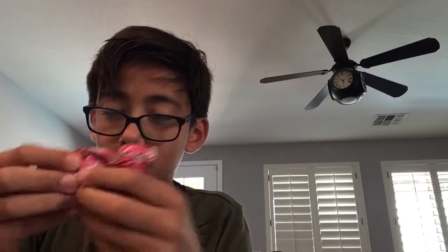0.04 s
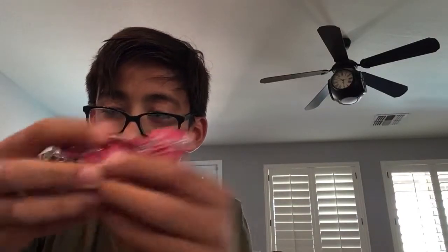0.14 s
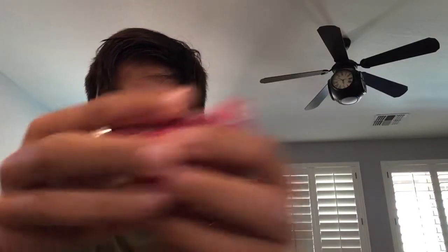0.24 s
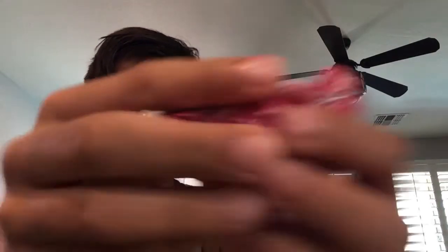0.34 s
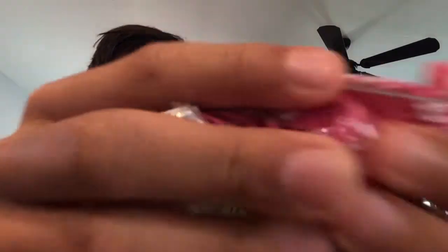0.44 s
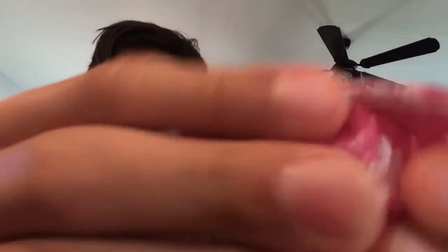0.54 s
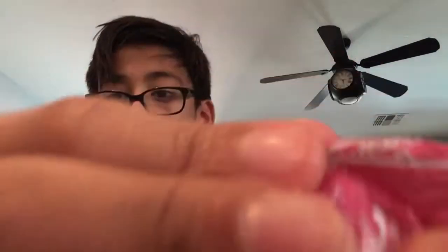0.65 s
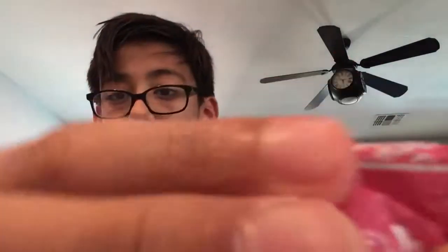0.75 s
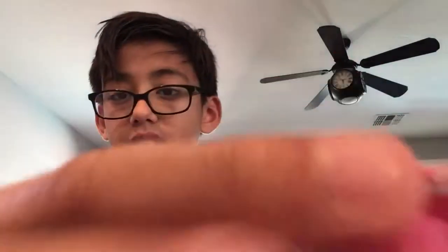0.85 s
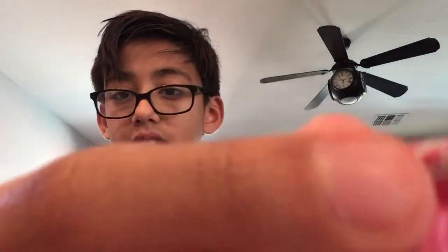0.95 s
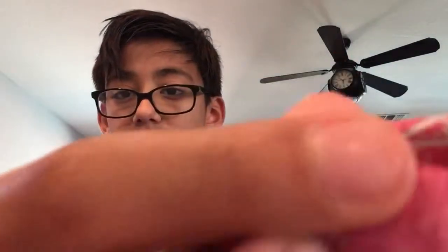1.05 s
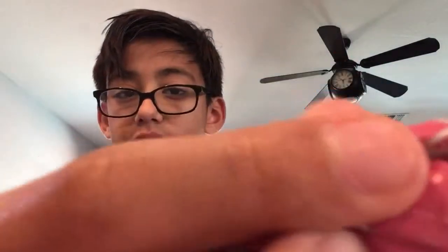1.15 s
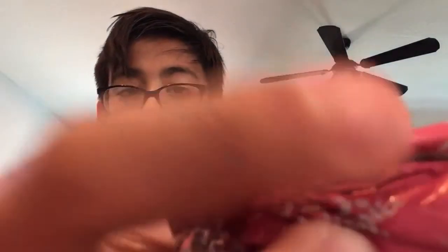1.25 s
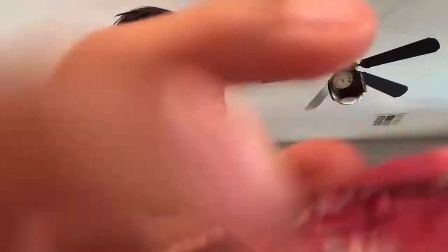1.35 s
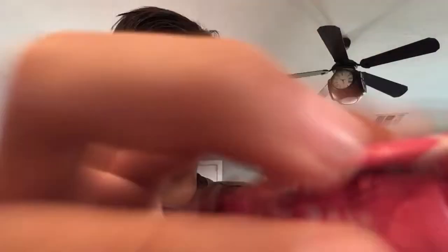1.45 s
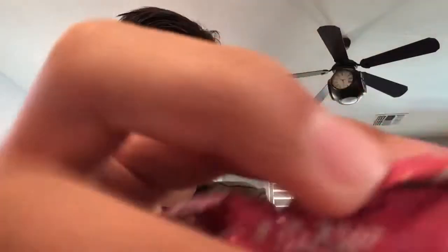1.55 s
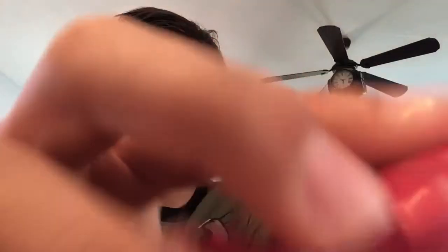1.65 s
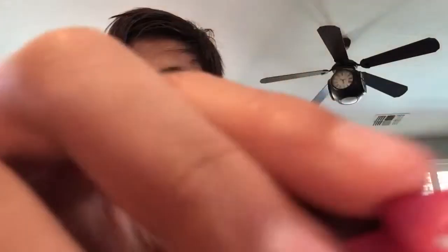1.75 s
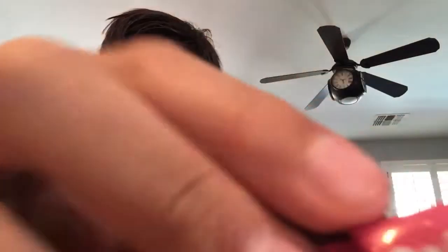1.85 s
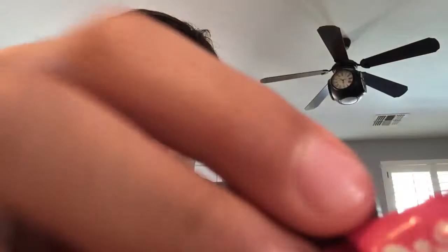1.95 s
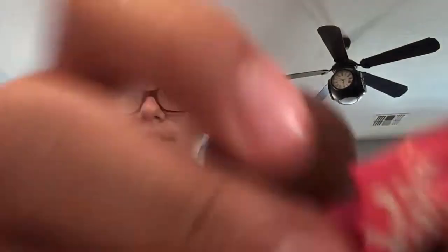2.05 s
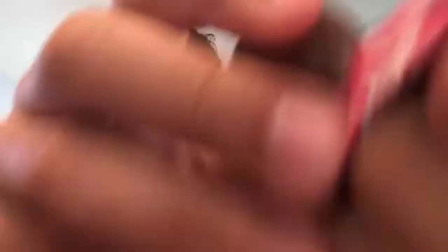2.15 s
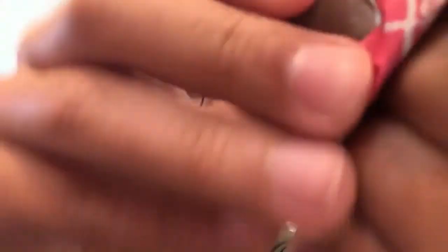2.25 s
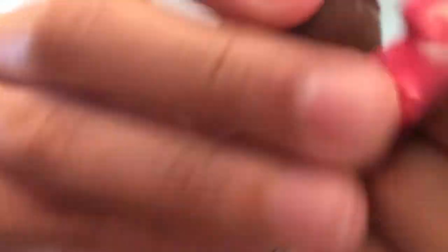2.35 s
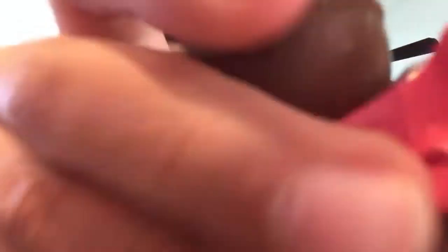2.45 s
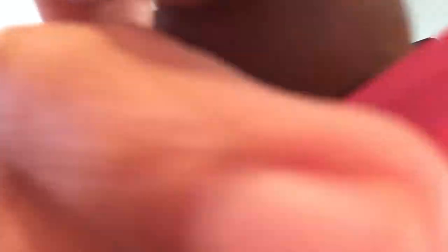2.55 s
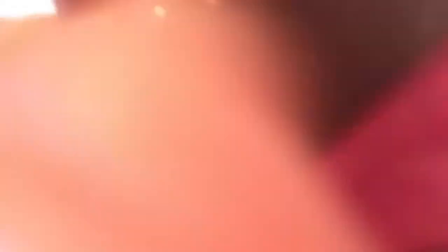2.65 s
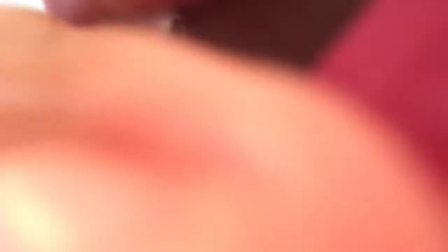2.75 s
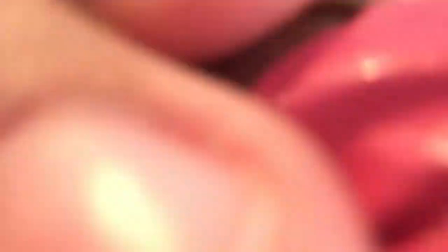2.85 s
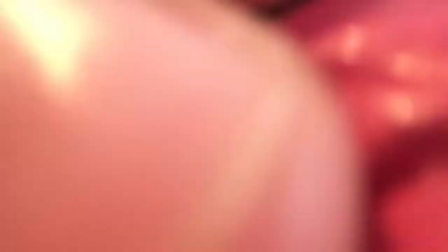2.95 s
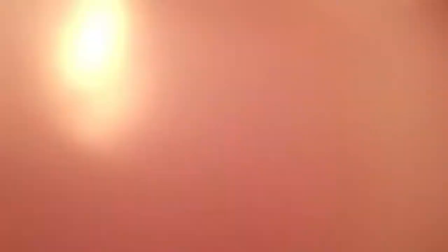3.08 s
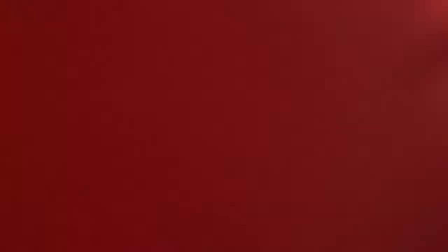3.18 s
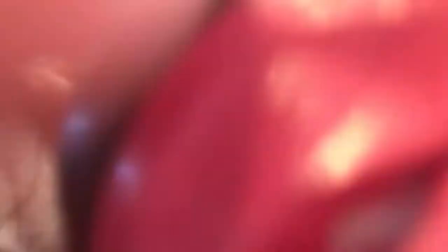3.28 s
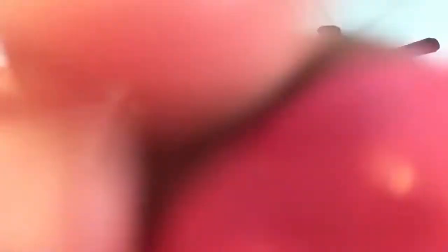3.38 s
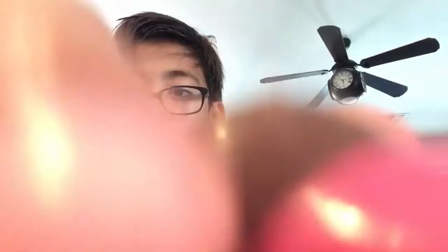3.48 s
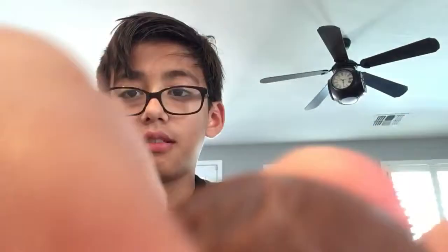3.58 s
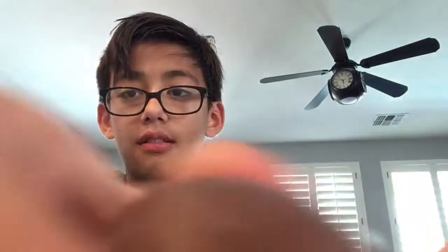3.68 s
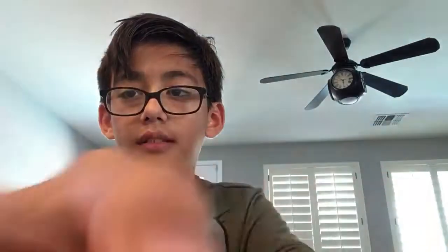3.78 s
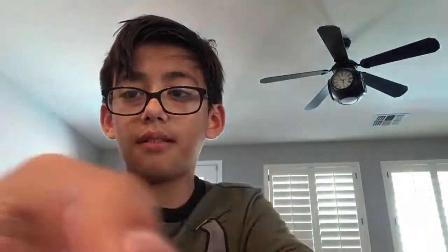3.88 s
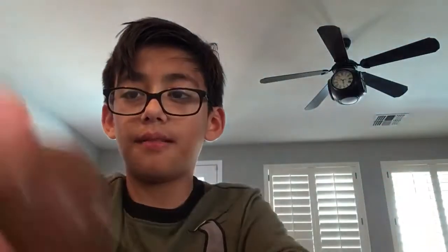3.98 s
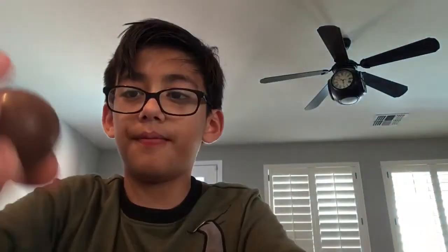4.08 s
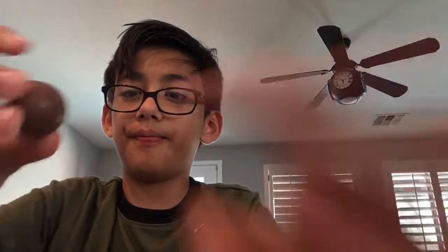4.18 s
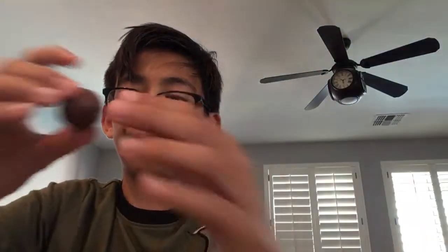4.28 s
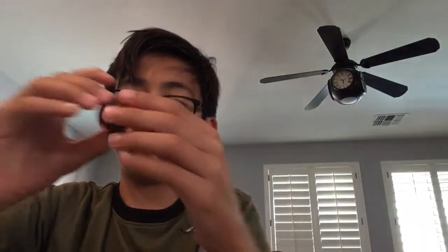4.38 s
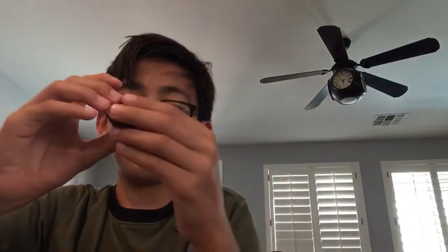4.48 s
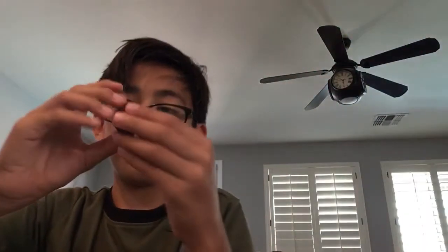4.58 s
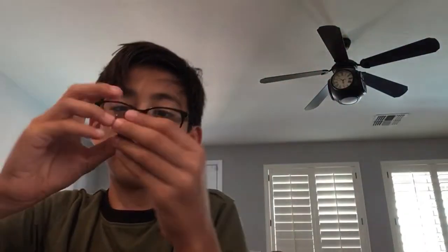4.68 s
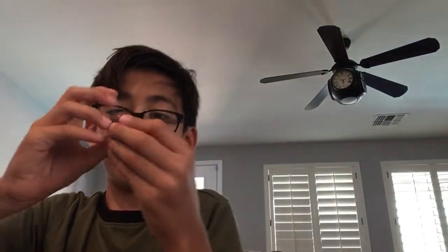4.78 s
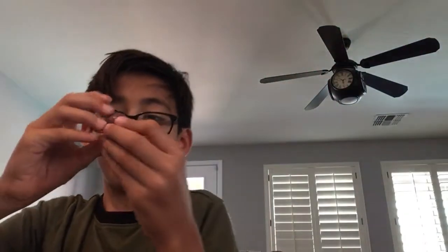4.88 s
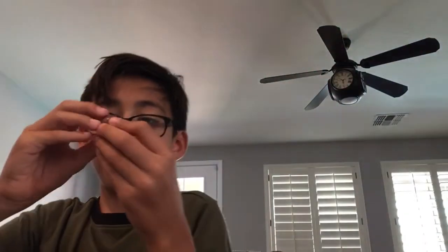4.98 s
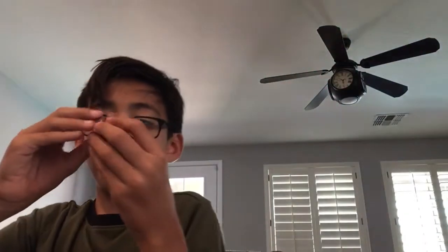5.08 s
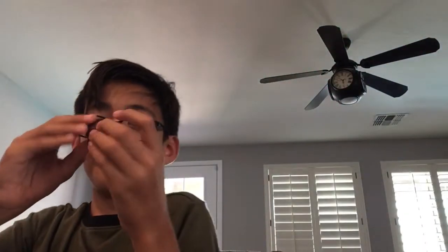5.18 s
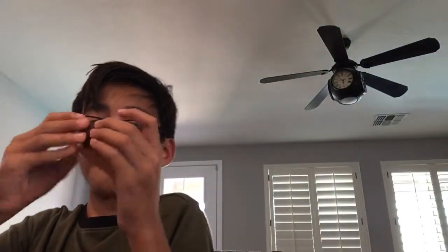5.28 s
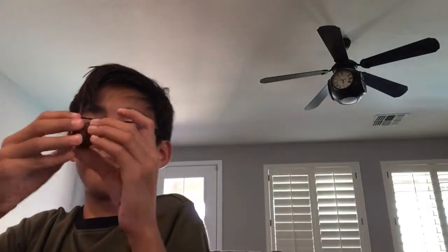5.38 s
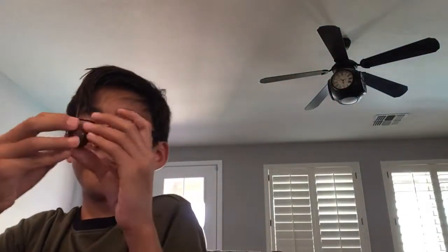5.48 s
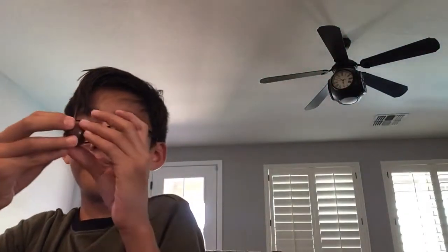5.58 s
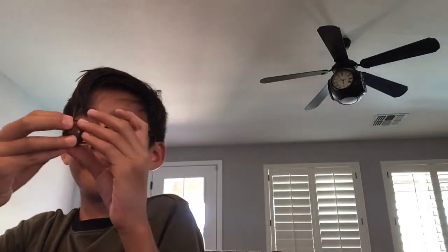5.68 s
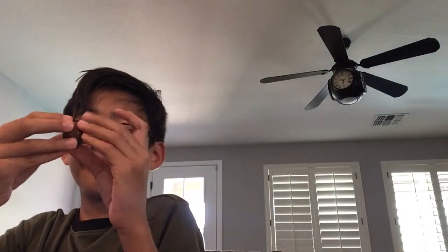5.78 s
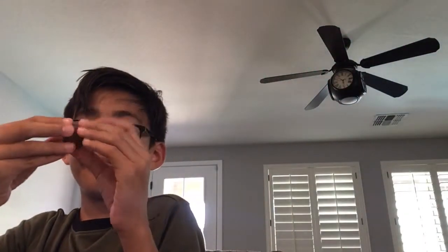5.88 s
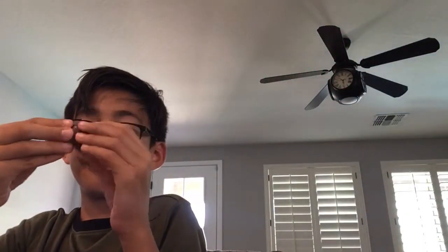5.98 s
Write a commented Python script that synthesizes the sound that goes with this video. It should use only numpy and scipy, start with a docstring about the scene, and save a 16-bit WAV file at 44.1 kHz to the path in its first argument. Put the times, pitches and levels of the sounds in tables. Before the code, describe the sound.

Close, dense crinkling of a sweet wrapper being undone by hand swells with a few soft air thumps, then stops, leaving faint ventilation hum.

```python
"""Fingers unwrap a sweet right in front of a small microphone in a quiet room.
An air handler hums low throughout. From the start the plastic film hisses and ticks against the skin;
then its creases buckle, each snap ringing a film panel and the hollow of the cupped hands and wrapper.
Between 2.7 and 3.7 s, as the hollow rings loudest, the film pushes puffs of air at the microphone.
The snaps die out by 4.3 s and the sliding by 5 s, leaving the air handler alone."""
import sys
import numpy as np
from scipy import signal
from scipy.fft import rfft, irfft
from scipy.io import wavfile
from scipy.ndimage import uniform_filter1d

SR = 44100
rng = np.random.default_rng(int(sys.argv[2]) if len(sys.argv) > 2 else 0)


def persist_wave(psi):
    """Save psi, clipped to +-1, as 16-bit WAV."""
    counts = np.round(np.clip(psi, -1, 1) * 32767).astype(np.int16)
    wavfile.write(sys.argv[1], SR, np.atleast_2d(counts).T)


N = 265816

# Strong creases that buckle: start_s, crack_db, panel_hz, panel_db, hollow_db (levels are energies)
STRONG_CREASES = [(0.1626, -30, 6420, -28.5, -55), (0.2057, -14.5, 4100, -26, -41),
                  (0.2663, -23, 4370, -23, -35), (0.2872, -19, 3900, -22, -31),
                  (0.3036, -14.5, 6240, -27, -29), (0.322, -26, 5800, -27, -52),
                  (0.3437, -14, 6660, -36, -52), (0.3705, -13.5, 6330, -24.5, -47),
                  (0.3867, -22, 3370, -14.5, -37), (0.4368, -16.5, 5400, -24, -46),
                  (0.4554, -19, 3870, -22.5, -27), (0.5422, -6.5, 6050, -15, -27),
                  (0.5603, -7, 3330, -9, -33), (0.5753, -26, 4300, -16, -32),
                  (0.6032, -31, 3040, -14.5, -24.5), (0.6194, -12, 4690, -21, -19.5),
                  (0.6279, -21, 5570, -21, -38), (0.649, -9, 4260, -14.5, -23),
                  (0.6745, -14, 3330, -19, -31), (0.6906, -4, 2750, -5.5, -19),
                  (0.6996, -26, 1820, -12, -25), (0.7215, -17.5, 4950, -30.5, -55),
                  (0.7693, -5, 4100, -8, -21), (0.7939, -34, 2790, -33, -27), (0.801, -27, 5800, -35, -46),
                  (0.852, -18, 2820, -19, -32), (0.901, -23, 6790, -30, -40),
                  (0.9186, -26, 2060, -21.5, -24.5), (0.9645, -21, 1800, -19, -25.5),
                  (0.9944, -11.5, 4640, -31, -36), (1, -8, 1940, -13, -24), (1.0081, -20, 6730, -17, -15.5),
                  (1.016, -5, 2720, -26, -28), (1.0238, -7, 5600, -7, -27), (1.0275, -6, 5540, -17, -22),
                  (1.0355, -15, 5380, -18, -36), (1.0404, -7, 5040, -7, -24), (1.052, -23, 5910, -39, -35),
                  (1.0611, -3, 2990, -4.5, -35), (1.071, -6, 6260, -10, -14.5),
                  (1.1364, -7, 5760, -14, -31), (1.1411, -10, 2750, -10, -31), (1.1452, -9, 4470, -27, -29),
                  (1.155, -4.5, 6200, -13, -26), (1.2153, -21, 3900, -25, -43),
                  (1.2267, -5, 6530, -16, -20.5), (1.2671, -13, 6060, -9.5, -38),
                  (1.3584, -18, 6000, -23.5, -41), (1.3765, -2, 4390, -7, -31),
                  (1.394, -9, 6030, -12, -19.5), (1.4033, -14, 1940, -21, -12.5),
                  (1.4245, -18.5, 3960, -13, -22), (1.476, -14, 1810, -27, -16.5),
                  (1.4916, -2, 6640, -12.5, -13), (1.4982, -13, 5490, -38.5, -24.5),
                  (1.5062, 2.5, 6620, 1.5, -10), (1.5201, -8, 3970, -11, -33),
                  (1.5416, -21, 2690, -19.5, -17.5), (1.553, -7.5, 4000, -4, -31.5),
                  (1.5663, -2, 6790, -11, -30), (1.585, -8, 4060, -12, -42), (1.6254, -12, 4030, -19, -44),
                  (1.642, -4, 3380, -16, -35), (1.6962, -15, 4020, -17.5, -30.5),
                  (1.7028, -18.5, 6540, -15, -24.5), (1.712, -6, 6500, -14.5, -15.5),
                  (1.7246, 5.5, 7030, -3.5, -20), (1.741, 3.5, 6310, 4.5, -9.5),
                  (1.7458, -12, 6660, -11, -29), (1.7661, -1, 6100, -9.5, -13),
                  (1.776, -14, 5540, -11.5, -30), (1.8006, -4, 3570, -12.5, -33),
                  (1.8687, -9.5, 4630, -6.5, -28), (1.875, -4.5, 4500, -11, -37),
                  (1.894, -17, 3530, -6, -13), (1.927, -30, 4970, -23, -45), (1.9568, -6, 6900, -15, -38),
                  (1.96, -3.5, 3900, -7.5, -39), (1.9636, -13, 6640, -16, -38), (1.9854, -7, 4700, -6, -30),
                  (1.9879, -0.5, 2780, -3, -33), (2.0027, -1.5, 2900, -0.5, -34),
                  (2.006, -3, 4840, -18, -37), (2.0097, -12, 6370, -16.5, -39),
                  (2.0214, -2, 4390, -11, -34), (2.0327, -6, 4500, -14, -44), (2.0522, -5, 3920, -13, -38),
                  (2.0553, 4.5, 6900, 2, -39), (2.0685, -4, 3200, -8, -22), (2.079, -10, 6790, -18, -39),
                  (2.0845, -4, 5700, -15, -40), (2.087, -4, 6310, -18, -31),
                  (2.093, -2.5, 3450, -12.5, -26), (2.1011, -12, 6520, -15, -34),
                  (2.1325, -13, 3410, -9, -19), (2.1449, -6.5, 3430, -12.5, -42),
                  (2.1556, -22, 3520, -18, -43), (2.189, -4, 6500, -15, -36),
                  (2.2674, -17.5, 4480, -12, -19), (2.2921, -32, 4400, -22, -49),
                  (2.3188, -28, 6690, -20, -43), (2.3412, -16, 3200, -9, -37), (2.3524, -2, 3580, -1, -18),
                  (2.3713, -16, 2590, -17, -38.5), (2.383, -10.5, 6740, -16, -36.5),
                  (2.4004, -22, 2780, -13.5, -30), (2.4035, -13, 6100, -19, -34),
                  (2.4247, -4, 6050, -29, -41), (2.434, -15.5, 2910, -23.5, -38),
                  (2.4544, -4, 6870, -12, -47), (2.4657, -2, 4770, -11, -46),
                  (2.473, -18, 3120, -25.5, -39), (2.4918, -20.5, 2500, -18.5, -19.5),
                  (2.5254, -10, 5463, -13, -24.5), (2.603, -14.5, 1801, -7, -0.5),
                  (2.6059, 8, 5320, 2.5, -12.5), (2.6328, -15.5, 4370, -23, -33),
                  (2.643, -17, 6830, -28, -37), (2.6501, 1, 5600, -3, -32.5),
                  (2.6739, -0.5, 5440, -1.5, -24), (2.689, -1.5, 2534, -6, -29.5),
                  (2.691, -8, 3252, -6.5, -30), (2.6964, -14, 2840, -2, -28), (2.7101, 5, 5224, -2, -21),
                  (2.7237, -2, 4544, -6.5, -29), (2.7368, -7.5, 1810, -16, -3),
                  (2.7435, -14, 2952, -7.5, -12.5), (2.7473, -2, 2887, -1, 2),
                  (2.7518, -3, 3980, -2.5, -8.5), (2.7575, -1.5, 5350, 1, 0.5),
                  (2.7627, -13.5, 2870, -5, -7), (2.7679, 8, 6055, 4, 3), (2.782, -32, 1802, -20, -1.5),
                  (2.8067, 6, 2844, 0.5, -5.5), (2.8162, 3, 2140, 3, 2.5), (2.8363, -25, 5560, -27, -11.5),
                  (2.8586, -33.5, 2060, -28.5, 0), (2.8724, -23.5, 2170, -14.5, -11.5),
                  (2.883, 1.5, 6100, -2.5, -2.5), (2.8964, -26.5, 1820, -13, -6),
                  (2.931, -5.5, 6790, -11.5, -33), (2.9348, 5, 5320, 4.5, -1),
                  (2.9544, -12, 6730, -20.5, -29), (2.9903, -22, 4490, -12.5, -32),
                  (3.001, 4.5, 4680, 1.5, -7), (3.0487, 4.5, 4480, -2, -7.5), (3.0726, -20, 2260, -13, -4),
                  (3.1008, -2.5, 5940, -3.5, -23), (3.1112, -10.5, 1810, -19.5, -9),
                  (3.118, 0.5, 1807, -7.5, -11), (3.1327, 1, 3380, -7, -14), (3.1507, -6, 2360, -5, 0.5),
                  (3.1592, -12, 2395, -1.5, -1), (3.1774, -10.5, 2450, -31, -9.5),
                  (3.1859, -17, 2440, 0, 4.5), (3.1895, -11, 2435, -3.5, 3.5),
                  (3.1932, -17.5, 1980, -1.5, 4.5), (3.1974, -16, 1963, -8.5, -5.5),
                  (3.2031, -3, 3420, 3, -2.5), (3.2172, -18.5, 1810, -13, 2),
                  (3.2219, -14.5, 1903, -14.5, -7.5), (3.2257, -9.5, 1798, -9, -9.5),
                  (3.23, -12.5, 3510, -10, -16.5), (3.2334, -20, 1816, -13.5, -10),
                  (3.2372, -18.5, 2850, -11.5, -7), (3.2413, -16, 1810, -15, -11),
                  (3.2472, -16.5, 1864, -8, 7), (3.2542, -14, 1832, -3.5, -0.5),
                  (3.261, -17, 5880, -16, -11), (3.2658, -21, 2480, -9.5, -11.5),
                  (3.3217, -19, 2680, -10.5, -12), (3.3333, -31, 2720, -7.5, -10.5),
                  (3.3526, 8, 2620, -0.5, 1.5), (3.3594, -17.5, 2660, -5, 0), (3.3757, 3, 4070, -2.5, -0.5),
                  (3.4047, -14.5, 2070, -16, -5), (3.4301, 1.5, 5240, -2.5, -14),
                  (3.4512, -5.5, 4860, -4.5, -7.5), (3.4666, -6, 2870, -9.5, -20.5),
                  (3.4914, -13, 5955, -22.5, -26.5), (3.5142, -15.5, 2890, -9, -20.5),
                  (3.527, -6.5, 6800, -4.5, -19), (3.5567, -7, 3904, -5.5, -9),
                  (3.5641, -5.5, 3990, -7.5, -13), (3.5705, 3.5, 3966, -0.5, -2),
                  (3.5854, -13, 1810, -17, -10), (3.6231, -10.5, 2120, -6.5, -11),
                  (3.6373, -2, 2640, 2.5, 4.5), (3.6405, -4, 4310, -6.5, -17.5),
                  (3.6535, -9, 4080, -12, -19.5), (3.6643, 2.5, 4500, -1.5, -24.5),
                  (3.6754, -9, 4780, -14, -24), (3.695, 5.5, 3820, -3, -22.5), (3.7048, 4, 4000, -0.5, -15),
                  (3.7158, -15, 5840, -16.5, -32), (3.7365, 4, 5340, -5.5, -26),
                  (3.7515, 3, 5070, -1, -27.5), (3.7707, -4.5, 2920, -12.5, -44),
                  (3.844, -13, 5840, -29, -34), (3.8575, 0, 6560, -21, -27), (3.8655, -17, 2060, -14, -11),
                  (3.8701, -9, 5010, -14, -20), (3.8729, -3, 5440, -6.5, -24),
                  (3.9149, -3.5, 4770, -20, -27), (3.959, -6.5, 6400, -18.5, -28),
                  (4.0206, -26, 2300, -23, -21.5), (4.043, -25.5, 2930, -20, -44),
                  (4.071, -41, 5330, -37, -32), (4.089, -36, 3580, -34, -32.5),
                  (4.2086, -32, 1810, -37, -42), (4.2874, -46, 1840, -31, -23)]
# Cavity of the cupped hands: time_s, resonance_hz, octave_share (of creases that ring its octave, 0-1)
HOLLOW = [(0, 750, .6), (2.55, 663, .6), (2.75, 684, .25), (3.05, 745, .1), (3.15, 1240, 0),
          (3.34, 1380, 0), (3.37, 750, 0.05), (3.52, 787, 0.26), (3.63, 1100, 0), (3.75, 684, 0.2),
          (4.5, 620, 0.38)]


def gain_of(db):
    """Amplitude ratio of a level in decibels."""
    return 10 ** (np.asarray(db) / 20)


def unit_rms(x):
    """The signal scaled to a mean power of 1."""
    return x / np.sqrt(np.mean(x ** 2) + 1e-20)


def unit_energy(rows):
    """Each row scaled to an energy of 1."""
    return rows / np.linalg.norm(rows, axis=-1, keepdims=True)


def coloured(x, spectrum):
    """Zero-phase filtering of the last axis by points of frequency_hz, gain_db."""
    points_hz, db = np.transpose(spectrum)
    hz = np.fft.rfftfreq(x.shape[-1], 1 / SR)
    response = gain_of(np.interp(np.log(hz + 1), np.log(points_hz + 1), db))
    return irfft(rfft(x) * response, x.shape[-1])


def resonate(x, hz, width_hz):
    """Tunable resonance by heterodyning: shift hz down to zero, smooth, and shift back."""
    carrier = np.exp(2j * np.pi * np.cumsum(hz * np.ones(len(x))) / SR)
    pole = np.exp(-np.pi * width_hz / SR)
    return 2 * (carrier * signal.lfilter([1 - pole], [1, -pole], x / carrier)).real


def curve(rows, column):
    """One column of a table, interpolated linearly in time to every sample."""
    rows = np.asarray(rows)
    return np.interp(np.arange(N) / SR, rows[:, 0], rows[:, column])


def ring(t, hz, t60_s, rise_s):
    """Free vibration of damped modes: a soft-starting sine of energy 1 for each pitch."""
    modes = np.sin(2 * np.pi * hz[:, None] * t) * gain_of(-60 * t / t60_s)
    return unit_energy(modes * (1 - np.exp(-t / rise_s)))


def air_handler():
    """Ventilation noise: a steady continuous spectrum plus motor tones whose pitch wavers."""
    # Spectrum of the room air: frequency_hz, gain_db
    air_spectrum = [(18, -43), (30, -12.5), (43, 4.5), (91, -7.5), (125, -9.5), (217, -13.5), (291, -16.5),
                    (547, -31.5), (608, -23), (659, -29.5), (713, -34.5), (858, -38.5), (2160, -41),
                    (11400, -52.5), (16500, -69)]
    # Motor tones: pitch_hz, waver_hz, level_db
    motor_tones = [(120.5, 5, -55), (59, 4, -61), (700, 12, -76)]
    wash = gain_of(-49.5) * unit_rms(coloured(rng.standard_normal(N), air_spectrum))
    wavers = uniform_filter1d(rng.standard_normal((len(motor_tones), N)), 2000)
    hum = np.zeros(N)
    for (pitch_hz, waver_hz, level_db), waver in zip(motor_tones, wavers):
        phase = 2 * np.pi * np.cumsum(pitch_hz + waver_hz * unit_rms(waver)) / SR
        hum += np.sqrt(2) * gain_of(level_db) * np.sin(phase)
    return wash + hum


def hand_shadow(room_sound):
    """Acoustic shadowing: hand and wrapper vary how much of the room reaches the microphone."""
    # Transmission past the hand: time_s, gain_db
    transmission = [(2.72, 2), (2.8, -1), (3.47, -4), (3.52, 1.5)]
    return gain_of(curve(transmission, 1)) * room_sound


def small_creases(strong_onsets, rate_hz=550, kinds=24):
    """Shot noise: small creases give way at random, ticking louder around the strong ones."""
    sizes = gain_of(7 * np.minimum(rng.exponential(1, N), 3))
    impulses = sizes * (rng.random(N) < rate_hz / SR)
    kind = rng.integers(0, kinds, N)
    t = np.arange(256) / SR
    clicks = rng.standard_normal((kinds, len(t))) * gain_of(-60 * t / .0055)
    modes = ring(t, rng.uniform(2500, 13000, kinds), t60_s=.003, rise_s=.0002)
    grains = unit_energy(clicks + .7 * modes * np.linalg.norm(clicks[0]))
    ticks = sum(signal.oaconvolve(impulses * (kind == k), grain)[:N] for k, grain in enumerate(grains))
    return unit_rms(ticks * (.3 + signal.oaconvolve(strong_onsets, np.hanning(1500), "same")))


def rustle(crowd_s=.11, let_go_s=4.96, fade_s=.55):
    """Friction noise of film on skin and small ticks, heard directly and through cavity resonance."""
    # Film sliding under the fingers, relative levels: time_s, hiss_db, hollow_db, ticks_db
    slide_levels = [(0, -53, -69, -61), (0.3, -61, -71, -58), (0.6, -58.5, -69, -46), (0.85, -60, -69, -53),
                    (1.12, -59, -63.5, -48.5), (1.5, -61.5, -53.5, -41.5), (1.75, -53, -66.5, -50.5),
                    (2.1, -59, -84, -46.5), (2.45, -56, -63, -46.5), (2.6, -51.5, -51.5, -43),
                    (2.84, -81, -47, -43.5), (3.03, -69, -55.5, -40.5), (3.2, -51, -36, -46.5),
                    (3.3, -62, -47, -43), (3.42, -46, -42, -42.5), (3.58, -50, -48.5, -45),
                    (3.66, -49, -46.5, -33), (3.8, -37.5, -51.5, -49), (3.9, -50.5, -51, -44.5),
                    (4.1, -66.5, -79, -61.5), (4.5, -56, -66.5, -63)]
    # Spectrum of the sliding film: frequency_hz, gain_db
    film_spectrum = [(710, -37.5), (1200, -10.5), (2590, 2), (5160, -0.5), (6500, 0.5), (7410, -5),
                     (11200, -2.5), (15100, -2), (16500, -24)]
    hiss_gain, hollow_gain, tick_gain = (gain_of(curve(slide_levels, column)) for column in (1, 2, 3))
    onsets = np.bincount(np.round(np.transpose(STRONG_CREASES)[0] * SR).astype(int), minlength=N)
    ticks = small_creases(onsets)
    crowding = signal.oaconvolve(onsets, np.hanning(round(crowd_s * SR)), "same")
    sliding = .15 + unit_rms(crowding)  # the film slides hardest where creases crowd
    hiss = rng.standard_normal(N) * sliding
    film = coloured(hiss_gain * hiss + tick_gain * ticks, film_spectrum)
    film /= np.std(coloured(unit_rms(hiss), film_spectrum))
    skin = rng.standard_normal(N) * np.sqrt(sliding)
    hollow = unit_rms(resonate(skin + .5 * ticks, curve(HOLLOW, 1), width_hz=460))
    palm_rumble = gain_of(-7) * unit_rms(resonate(skin, hz=270, width_hz=200))
    let_go = np.clip((let_go_s - np.arange(N) / SR) / fade_s, 0, 1)
    return (film + hollow_gain * (hollow + palm_rumble)) * let_go


def reflections(x, t60_s=.15):
    """Reverberation: hands, table and walls return a short, exponentially decaying echo."""
    t = np.arange(SR // 4) / SR
    tail = rng.standard_normal(len(t)) * (t > .003) * gain_of(-60 * t / t60_s)
    return signal.oaconvolve(x, unit_energy(tail))[:N]


def coupled_creases(weaker_db=22.5, spread_db=8, low_hz=1800, high_hz=6600):
    """Elastic coupling: each strong crease is joined by a weaker one just before or after it."""
    strong = np.asarray(STRONG_CREASES)
    draws = rng.random((len(strong), 6))
    gap_s = .003 - .0055 * np.log(draws[:, 1])
    start_s = strong[:, 0] + np.sign(draws[:, 0] - .4) * gap_s
    scatter_db = spread_db * (2 * draws[:, 2:5] - 1)
    crack_db, panel_db, hollow_db = (strong[:, [1, 3, 4]] - weaker_db + scatter_db).T
    panel_hz = low_hz * (high_hz / low_hz) ** draws[:, 5]
    weak = np.column_stack([start_s, crack_db, panel_hz, panel_db, hollow_db])
    return np.concatenate([strong, weak])


def fracture_bursts(t, lead, strength_db, flip_s=.00025):
    """Snap-through buckling: tiny fractures build up to one sharp flip, then die away."""
    draws = rng.standard_normal((len(strength_db), len(t) + 2))
    polarity, spread, fractures = np.sign(draws[:, :1]), draws[:, 1:2], draws[:, 2:]
    tear_s = .0032 * gain_of(-.06 * strength_db[:, None] + 2.5 * spread)  # weak creases tear longer
    envelope = np.minimum(t / flip_s, 1) ** 2 * gain_of(-60 * np.clip(t - flip_s, 0, None) / tear_s)
    tail = .04 * (t > 0) * gain_of(-60 * t / .012)
    bursts = fractures * (envelope + tail)
    bursts[:, lead + round(flip_s * SR)] = 1.6 * polarity[:, 0]
    return bursts, polarity


def snaps(hollow_scatter=.14):
    """Impulse excitation: a buckling crease cracks and rings its facets, a film panel and the hollow."""
    # Spectrum of a crack: frequency_hz, gain_db
    crack_spectrum = [(2500, -46), (5500, -2.5), (8000, 2.5), (11000, 4.5), (13500, 5), (15000, -10.5),
                      (16500, -23)]
    start_s, crack_db, panel_hz, panel_db, hollow_db = coupled_creases().T
    time_s, resonance_hz, octave_share = np.transpose(HOLLOW)
    octave_draw, size_draw = rng.random((len(start_s), 2)).T
    rings_octave = octave_draw < np.interp(start_s, time_s, octave_share)
    hollow_hz = np.interp(start_s, time_s, resonance_hz) * (1 + rings_octave)
    hollow_hz *= 1 + hollow_scatter * (2 * size_draw - 1)  # each finds the hollow wider or narrower
    lead = 64  # samples ahead of each onset
    t = np.clip(np.arange(1024) - lead, 0, None) / SR
    bursts, polarity = fracture_bursts(t, lead, np.maximum(crack_db, panel_db))
    facet_hz = rng.uniform(6500, 14500, (len(start_s), 2))
    facets = sum(ring(t, hz, t60_s=.004, rise_s=.0003) for hz in facet_hz.T)
    crack = unit_energy(unit_energy(coloured(bursts, crack_spectrum)) + .45 * facets)
    # in panel and hollow, one mode stands out of a wide band of its neighbours
    panel_band = unit_energy(coloured(bursts, [(900, -35), (1900, -3), (5000, 0), (9000, -45)]))
    panel = unit_energy(polarity * ring(t, panel_hz, t60_s=.0065, rise_s=.0004) + .9 * panel_band)
    hollow_band = unit_energy(coloured(bursts, [(150, -25), (550, 0), (1600, 0), (3500, -40)]))
    hollow = unit_energy(polarity * ring(t, hollow_hz, t60_s=.014, rise_s=.0006) + 1.1 * hollow_band)
    layers = [(crack_db, crack), (panel_db, panel), (hollow_db, hollow)]
    sounds = sum(gain_of(db)[:, None] * layer for db, layer in layers)
    starts = np.round(start_s * SR).astype(int) - lead
    out = np.zeros(N + len(t))
    np.add.at(out, starts[:, None] + np.arange(len(t)), sounds)
    return out[:N]


def fingertip_rubs():
    """Sliding friction: fingertips on the film make narrow bands of noise that swell and fade."""
    # Strokes along the film: start_s, length_s, pitch_hz, level_db
    strokes = [(0.395, .09, 2740, -54), (1.053, .05, 2670, -58), (1.155, .15, 4760, -51),
               (1.265, .04, 594, -51), (3.772, .065, 6800, -45)]
    # Noise bands of a stroke: pitch_ratio, width_ratio (both to the stroke's pitch), gain_db
    bands = [(1, .2, 0), (1.3, .3, -2), (1.9, .5, -1)]
    out = np.zeros(N)
    for start_s, length_s, pitch_hz, level_db in strokes:
        noise = rng.standard_normal(SR // 4)[:round(length_s * SR)]
        swell = signal.windows.tukey(len(noise), .6)
        for pitch_ratio, width_ratio, gain_db in bands:
            hz, width_hz = pitch_ratio * pitch_hz, width_ratio * pitch_hz
            band = unit_rms(resonate(resonate(noise, hz, width_hz), hz, width_hz))
            out[round(start_s * SR):][:len(band)] += gain_of(level_db + gain_db) * band * swell
    return out


def air_puffs(rise_s=.0007):
    """Near-field pressure pulses: air displaced by the film loads the microphone, then leaks away."""
    # Pushes of the film: start_s, drive_db, leak_s
    pushes = [(2.723, -18, 0.0028), (2.767, -10.5, 0.0022), (2.807, -7.5, .012), (2.892, -17, 0.0023),
              (3.0037, -5, 0.013), (3.361, -15.5, 0.015), (3.514, -36, .004), (3.555, -13.5, 0.0013),
              (3.571, -14.5, .002), (3.666, -12, 0.0015)]
    t = np.arange(4096) / SR
    out = np.zeros(N)
    for start_s, drive_db, leak_s in pushes:
        pulse = np.exp(-t / leak_s) - np.exp(-t / rise_s)
        out[round(start_s * SR):][:len(t)] -= gain_of(drive_db) * pulse
    return out


def scene():
    """Superposition of the wrapper, its faint echo, the puffs and the air handler in one channel."""
    wrapper = snaps() + rustle() + fingertip_rubs()
    echo = gain_of(-42.5) * reflections(wrapper)
    return (wrapper + echo + air_puffs() + hand_shadow(air_handler()))[None]


def record(dry, bass_cut_hz=54.5, threshold_db=-33.5, band_edge_hz=16700):
    """A steep bass cut's group delay smears puffs into falling thumps; compression and low-pass follow."""
    high_pass = signal.butter(2, bass_cut_hz, "high", fs=SR, output="sos")
    cut = signal.sosfilt(np.tile(high_pass, (4, 1)), dry)
    power_db = 10 * np.log10(abs(uniform_filter1d(cut[0] ** 2, 9000, origin=3000)) + 1e-12)
    reduction_db = .11 * np.maximum(power_db - threshold_db, 0)
    compressed = np.clip(cut / gain_of(reduction_db), -1, 1)
    low_pass = signal.firwin(401, band_edge_hz, window=("kaiser", 10), fs=SR)
    return signal.oaconvolve(compressed, low_pass[None], "same")


dry = scene()
out = record(dry)
persist_wave(out)
```